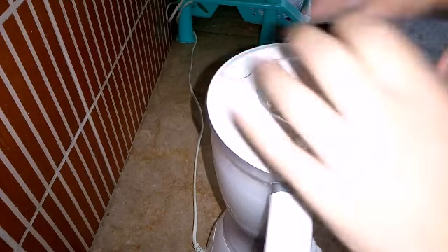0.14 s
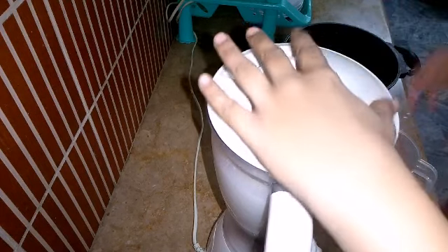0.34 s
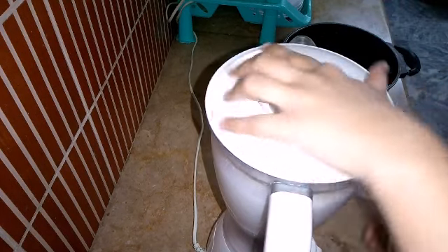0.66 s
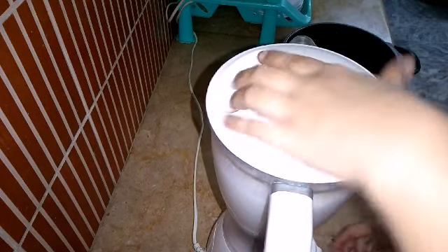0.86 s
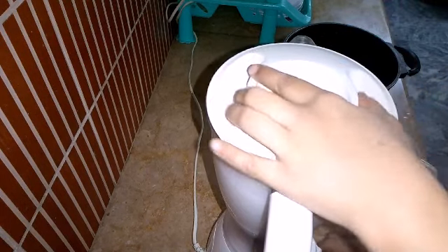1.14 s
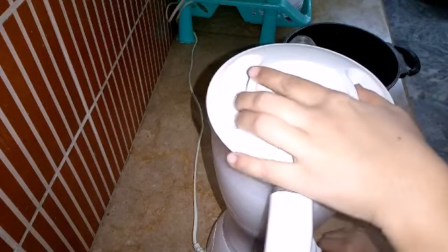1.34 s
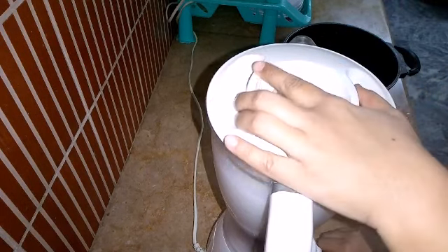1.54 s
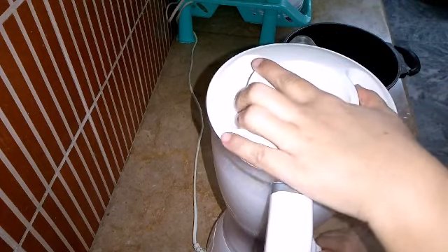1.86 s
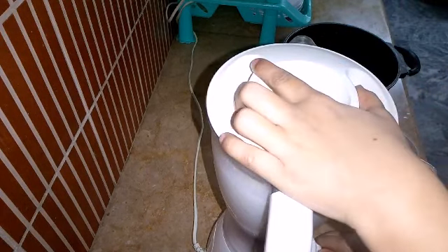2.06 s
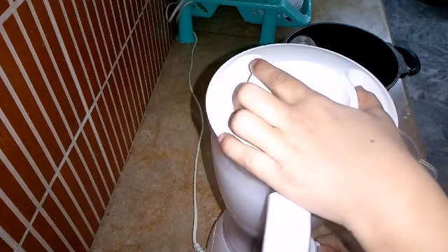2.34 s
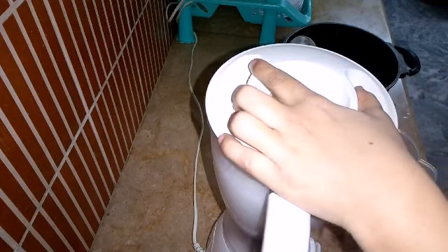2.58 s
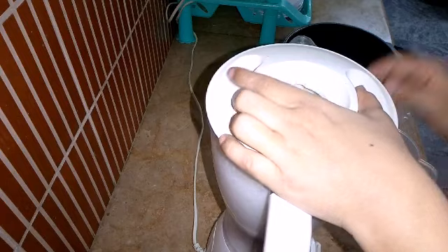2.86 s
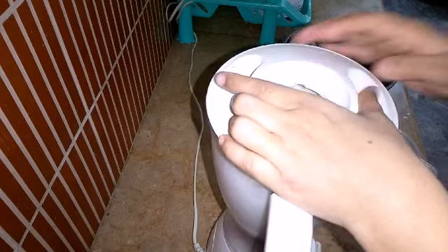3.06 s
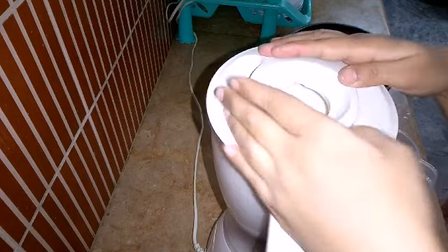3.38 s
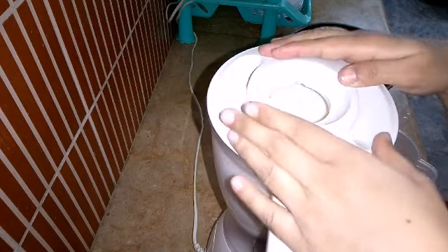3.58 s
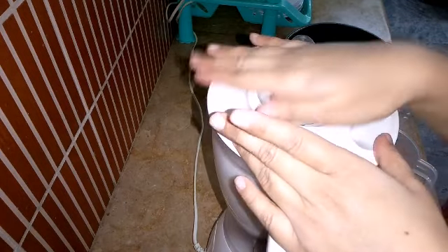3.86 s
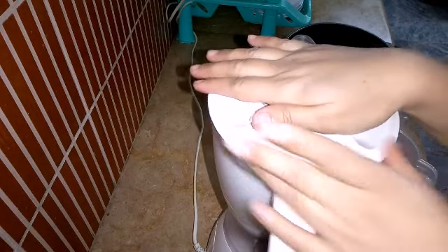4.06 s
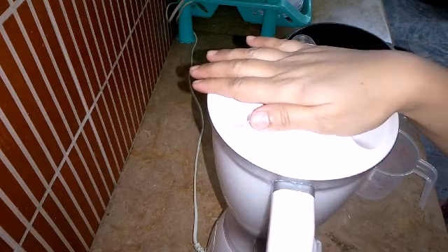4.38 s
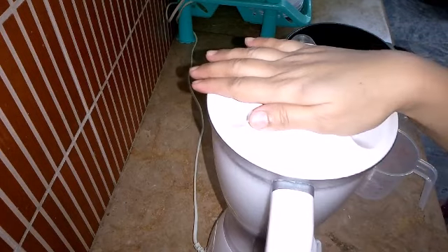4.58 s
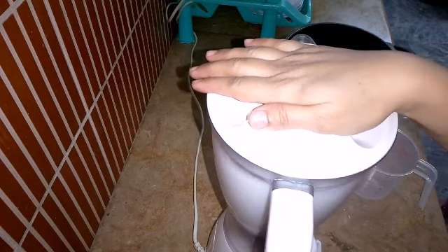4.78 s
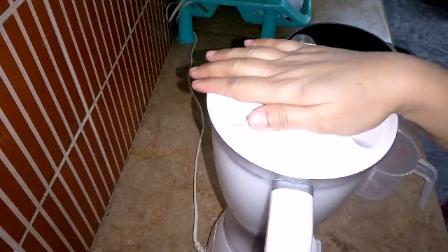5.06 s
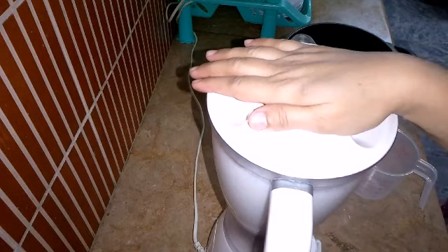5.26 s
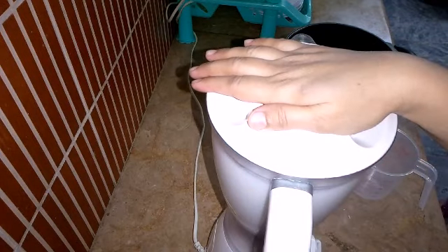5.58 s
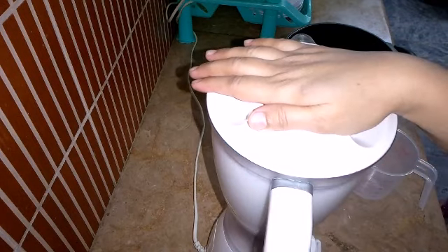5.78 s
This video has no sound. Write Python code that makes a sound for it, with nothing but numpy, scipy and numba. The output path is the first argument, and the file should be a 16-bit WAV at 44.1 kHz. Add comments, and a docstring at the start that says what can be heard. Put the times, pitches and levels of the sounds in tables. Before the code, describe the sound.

Fingers rub and tap a plastic blender lid in a quiet kitchen, then the motor starts abruptly, the lid rattles, and a palm steadies it.

```python
"""In a quiet kitchen, close to the phone, a hand rubs, taps and presses the plastic lid of a blender:
slipping skin is shaped noise, each touch a short push through the lid's resonances.
At the switch the motor runs up: wavering shaft tones and mains hum over noise for the churning liquid.
The loosely held lid then rattles on the jar, grains and a knock per turn through the same lid modes,
until a flat palm stills it. Room tone lies under all of it; a faint whine grows early and stays."""
import sys
import numpy as np
from scipy import signal
from scipy.fft import rfft, irfft, next_fast_len
from scipy.io import wavfile
from scipy.ndimage import uniform_filter1d
from numba import njit

SR = 44100
rng = np.random.default_rng(int(sys.argv[2]) if len(sys.argv) > 2 else 0)


def store_wav(level_fs):
    """Save 16-bit WAV to argv[1]."""
    pcm = np.round(np.clip(np.atleast_2d(level_fs), -1, 1) * 32767)
    wavfile.write(sys.argv[1], SR, pcm.T.astype(np.int16))


N = 261072
T = np.arange(N) / SR  # time, s

# resonances of the plastic lid: f/Hz, nominal width/Hz, relative level/dB
LID_MODES = [(418, 20, -2.5), (477.7, 66, 4), (537.4, 68, 0.5), (642, 64, 3.5), (721, 73, 1), (830, 37, -2),
             (1004, 310, -7.5), (1800, 770, -11.5)]

SWITCH_S = 2.286
PALM_S, PALM_TAKES_S = 3.92, 0.203  # the palm comes down on the lid
BITE_S, BITE_DB = 0.01, -34.5  # how fast, and from how far down, the blender sets in


def motor():
    """Shaft tones waver in level and phase as the load sloshes; mains pull shifts some by 100 Hz."""
    # the two strongest shaft tones: t/s, once-a-turn level/dB, twice-a-turn level/dB
    shake = [(2.5, -38, -48), (2.56, -44, -51), (2.7, -37, -28), (2.78, -40.5, -41.5), (2.84, -36, -45),
             (2.91, -41, -46), (2.96, -38, -37), (3.03, -37.5, -44), (3.18, -37, -37), (3.21, -48.5, -28.5),
             (3.28, -39, -37), (3.3, -48, -36.5), (3.4, -28.5, -30), (3.45, -40, -41.5), (3.5, -37, -29.5),
             (3.58, -34, -28.5), (3.6, -58, -28), (3.63, -35, -41.5), (3.73, -32, -44), (3.76, -32.5, -31),
             (3.79, -39, -38), (3.83, -31.5, -47), (3.88, -45, -41), (3.94, -29, -31), (3.99, -33, -40.5),
             (4.07, -35, -29), (4.12, -34, -36), (4.18, -32.5, -37), (4.22, -51, -35), (4.26, -32, -35),
             (4.29, -35.5, -32), (4.39, -27.5, -39.5), (4.49, -41.5, -28.5), (4.68, -43, -37.5),
             (4.79, -44.5, -28.5), (4.88, -48.5, -34), (5.05, -33, -41), (5.11, -46, -35.5),
             (5.19, -44, -38), (5.23, -45, -50), (5.26, -55, -40), (5.29, -42.5, -40), (5.32, -35.5, -35.5),
             (5.36, -43.5, -32.5), (5.5, -44, -37), (5.57, -37, -28), (5.62, -56, -47), (5.67, -45, -32.5),
             (5.74, -39, -38), (5.8, -49, -36.5), (5.87, -36.5, -36), (5.92, -48, -38)]
    # higher shaft tones: multiple of the turn, mains shift f/Hz, relative level/dB
    tones = [(0, 100, -55), (1, 100, -56), (2, -100, -56), (2, 100, -51), (3, 0, -60), (4, 0, -50),
             (5, 0, -56), (6, 0, -48.5), (7.5, 0, -55), (7, 0, -53), (12, 0, -55), (12, 100, -53.5)]
    slow_shaft_db = -25  # the once-a-turn tone is weak while the rotor is slow
    tones_slow_db, tones_settle_s = 9, 0.21  # higher tones start louder, then settle
    tones_loose_db = -8.5  # higher tones, loose lid against held lid
    hum_db, hum_centre_s, hum_1db_s = -39, 2.27, 0.043  # bell in dB; 1 dB down after hum_1db_s
    groan_hz, groan_width_hz, groan_db = 1040, 270, -41.5
    groan_s, groan_1db_s = 2.396, 0.023

    turn = 2 * np.pi * turns()
    once_db, twice_db = columns(shake)
    once_db = once_db + slow_shaft_db * since_on(.08) + walk(40)
    out = undb(once_db) * np.sin(turn + .55 * walk(20))
    out += undb(twice_db + 1.8 * walk(30)) * np.sin(2 * turn + .3 * walk(24))

    held = ramp(PALM_S, PALM_TAKES_S)
    effort = undb(tones_slow_db * since_on(tones_settle_s) + tones_loose_db * (0.5 - held))
    for k, shift_hz, db in tones:
        phase = k * turn + 2 * np.pi * shift_hz * T + (.6 + .05 * k) * walk(20)
        out += effort * undb(db + 2.2 * walk(20)) * np.sin(phase)

    # the slow rotor draws heavy current: mains hum and its overtones, fading as it gains speed
    overtones = ((1, .3), (2, 1), (3, .15))
    hum = sum(np.sin(2 * np.pi * 100 * k * T) * share for k, share in overtones)
    out += hum * undb(hum_db - ((T - hum_centre_s) / hum_1db_s) ** 2 + 2 * walk(29.7))

    # the straining motor groans
    groan = ring(ring(rng.standard_normal(N), groan_hz, groan_width_hz), groan_hz, groan_width_hz)
    out += level(groan, groan_db) * undb(-((T - groan_s) / groan_1db_s) ** 2)
    return np.sqrt(2) * out * undb(BITE_DB * since_on(BITE_S)) * (T > SWITCH_S)


def churn():
    """Blades beat the liquid: dense splashes, each band flickering; spray carries the treble."""
    # spectrum of the splashing: f/Hz, relative level/dB
    churn_colour = [(100, -25.5), (140, -10.5), (215, -20.5), (260, -10), (305, -7), (350, -14),
                    (400, -6.5), (460, -15.5), (520, -13.5), (620, -11.5), (820, -10.5), (1000, -12.5),
                    (1600, -15.5), (3300, -24.5), (6200, -33.5), (7700, -45.5), (12000, -36)]
    # resonances of the jar: f/Hz, width/Hz, lift in level/dB
    jar = [(181.5, 10, 7.5), (314.6, 4.5, 6), (854, 38, 2.5), (1086, 24, 1.5), (1148, 140, 4),
           (1401, 40, 2.5), (1954, 190, 3.5), (2460, 770, 3.5)]
    churn_db, slow_db, grow_s = -33.5, -6.5, 0.12
    spray_db, spray_s, spray_takes_s = -6.5, 2.37, 0.11
    early_db, loose_db = -8, 1.5  # before the blades bite; through the gap of the loose lid
    fling_hz, fling_width_hz, fling_db = 5500, 3200, -38
    fling_s, fling_1db_s = 2.45, 0.014

    db = churn_db + slow_db * since_on(grow_s) + BITE_DB * since_on(BITE_S)
    spray_db = spray_db + early_db * (1 - ramp(spray_s, spray_takes_s))
    spray_db = spray_db + loose_db * (1 - ramp(PALM_S, PALM_TAKES_S))

    rush = colour(rng.standard_normal(N) + 0.38 * grains(1200, 2.3), churn_colour)
    rush = rush + sum((undb(lift_db) - 1) * ring(rush, hz, w) for hz, w, lift_db in jar)
    low, high = cut(rush, 546, "low"), cut(rush, 2850, "high")
    middle = cut(cut(rush, 810, "high"), 1610, "low")
    body = undb(-3 + 1.5 * walk(25)) * low + undb(.6 * walk(12)) * middle
    spray = undb(spray_db + 0.6 * walk(25)) * level(high, 0)
    body = body / np.std(middle) + spray

    # liquid thrown up the wall as the blades bite
    fling = ring(ring(rng.standard_normal(N), fling_hz, fling_width_hz), fling_hz, fling_width_hz)
    fling = undb(fling_db - ((T - fling_s) / fling_1db_s) ** 2) * level(fling, 0)
    return (undb(db) * body + fling) * (T > SWITCH_S)


def turns():
    """Shaft turns so far: the speed nears its loose-lid value, then gains a little under the palm."""
    first_hz, loose_hz, held_hz, run_up_s = 68, 142.2, 144.7, .165
    hz = loose_hz - (loose_hz - first_hz) * since_on(run_up_s)
    hz = hz + (held_hz - loose_hz) * ramp(PALM_S, PALM_TAKES_S)
    return np.cumsum(hz) / SR


def rattle():
    """The lid chatters on the shaking jar, partly in step with each turn."""
    # jolts that throw the lid harder: t/s, relative level/dB
    jolts = [(2.606, -54), (2.711, -30.5), (2.851, -47), (3.208, -27), (3.241, -26.5), (3.27, -23.5),
             (3.305, -24), (3.36, -35), (3.418, -25), (3.613, -23), (3.69, -34), (3.831, -29.5)]
    jolt_rise_s, jolt_fall_s = 0.0048, 0.041
    rattle_s, rattle_db, stilled_db, buzz_db = 2.54, -28, -19, -4.5
    gripped_db, free_db = -5, -1  # upper modes come up as the fingers let go
    let_go_s, let_go_takes_s = 3.17, 0.059

    held = ramp(PALM_S, PALM_TAKES_S)
    size = undb(rattle_db)
    for s, db in jolts:
        size = size + undb(db) * ramp(s, jolt_rise_s) * np.exp(-abs(T - s) / jolt_fall_s)
    upper_db = gripped_db + (free_db - gripped_db) * ramp(let_go_s, let_go_takes_s)

    knocks = np.diff(np.floor(turns()), prepend=0) * undb(2 * walk(60))  # one a turn
    force = (grains(9000, .6) + 2.2 * knocks) * undb(.5 * walk(50))
    chatter = size * cut(lid(force, upper_db), 392, "high") / 2
    # a buzz at four times the turn
    buzz = undb(buzz_db + 1.5 * walk(25)) * np.sin(8 * np.pi * turns() + 1.1 * walk(30))
    gate = ramp(rattle_s, 0.014) * (1 - held) * undb(stilled_db * held)
    return gate * (chatter + undb(rattle_db) * buzz)


def lid(force, upper_db):
    """A force rings the lid's modes; those above 620 Hz have their own share."""
    out = 0
    for hz, w, db in LID_MODES:
        mode = ring(ring(force, hz, w), hz, 3 * w)
        out = out + undb(db + upper_db * (hz > 620)) * level(mode, 0)
    return out


def taps():
    """A soft push rings the lid modes near its pitch; a nail or latch adds a short tick."""
    # taps, presses, the switch and the hardest knocks of the loose lid:
    # t/s, thump peak level/dB, pitch f/Hz, tick peak level/dB, tick f/Hz
    tap_list = [(0.019, -38, 560, -53, 2800), (.352, -70, 500, -64, 5200), (0.418, -30, 527, -68, 2000),
                (0.434, -43, 500, -70, 2800), (.44, -72, 500, -64, 4500), (0.475, -29, 475, -37.5, 1190),
                (0.491, -31, 410, -36.5, 3180), (0.662, -40, 715, -33.5, 2700),
                (0.784, -43, 430, -62, 2800), (0.798, -43, 420, -57, 2800), (0.975, -51, 485, -67, 2800),
                (0.986, -36, 480, -50, 1500), (1.019, -59, 670, -50, 4140), (1.138, -44, 479, -52, 2800),
                (1.197, -30.5, 480, -37, 1170), (1.212, -43, 473, -66, 1500), (1.261, -41, 555, -41, 1100),
                (1.267, -38.5, 480, -57, 1300), (1.513, -53, 644, -66, 3100),
                (1.543, -49.5, 664, -41, 2450), (1.557, -54, 1110, -50, 2050), (1.676, -72, 600, -58, 2300),
                (1.802, -60, 1320, -74, 1300), (1.854, -58, 200, -71, 1500), (1.944, -54, 474, -74, 1200),
                (2.285, -48, 600, -59, 2800), (2.304, -34, 604, -34, 2850), (3.257, -10, 560, -30, 1500),
                (3.311, -19.5, 470.4, -31, 1530), (3.427, -23, 533, -40, 1480),
                (3.612, -15, 607, -35, 1310), (3.835, -22.5, 640, -44, 3300)]
    # resonances of the latch: f/Hz, width/Hz, relative level/dB
    latch_modes = [(1180, 120, -9), (1990, 150, -2), (2350, 110, 2), (2560, 130, 1), (3000, 300, -7),
                   (4700, 300, -18)]
    latch_s = 1.542  # the tap at which the latch snaps

    out, t = np.zeros(N + SR // 4), T[:SR // 4]
    chance = rng.standard_normal((len(tap_list), len(t)))
    for (s, thump_db, hz, tick_db, tick_hz), noise in zip(tap_list, chance):
        push = np.sin(2 * np.pi * hz * t) * (t / .001) * np.exp(-t / .0017)
        slap = cut(ring(noise * np.exp(-t / .004), 2.2 * hz, 1.6 * hz), 1800, "low")
        modes = sum(undb(db) * ring(push, f, .4 * w) for f, w, db in LID_MODES)
        thump = push + 1.3 * modes + .4 * slap

        crack = noise * (np.exp(-t / 0.0048) + 0.064 * np.exp(-t / 0.014))
        tick = .6 * ring(ring(crack, tick_hz, .8 * tick_hz), tick_hz, tick_hz)
        if abs(s - latch_s) < .005:
            scrape = noise * (np.exp(-t / .003) + .16 * np.exp(-t / .09))
            tick = tick + 3.5 * sum(undb(db) * ring(scrape, f, w) for f, w, db in latch_modes)

        i = int(s * SR)
        out[i:i + len(t)] += undb(thump_db) * thump / abs(thump).max()
        out[i:i + len(t)] += undb(tick_db) * tick / abs(tick).max()
    return out[:N]


def rub():
    """Skin slips over plastic: fine hiss, small slips that shake the lid, a rumble underneath."""
    # strokes of the fingers: start t/s, hold t/s, skin hiss level/dB, lid body level/dB, fade/(dB per s)
    strokes = [(0, 0.022, -60.5, -57.5, 63), (0.148, 0.047, -69, -72, 80), (.23, .06, -72, -82, 60),
               (0.318, 0.091, -66, -70, 62), (0.485, 0.047, -60.5, -55, 49), (0.6, 0.12, -56.5, -52, 82),
               (0.864, 0.12, -70.5, -68, 50), (0.983, .18, -63, -56.5, 65), (1.205, .03, -64, -54, 60),
               (1.262, 0.023, -67, -53.5, 60), (1.56, 0.073, -73.5, -75, 84),
               (2.137, 0.018, -72, -72.5, 226)]
    # spectrum of the skin hiss: f/Hz, relative level/dB
    skin = [(530, -30), (900, -1), (1100, 1), (1370, -3), (2390, -1.5), (3290, -1.5), (3800, -0.5),
            (6730, -17), (7630, -97), (9920, -54), (16800, -120)]
    rise_db_s, body_steeper = 298, 1.09
    rumble_db, rumble_follows = -63.5, 0.75  # the rumble follows part of the hiss level

    start, hold, hiss_db, body_db, fade = np.transpose(strokes)[:, :, None]
    drop = rise_db_s * np.maximum(start - T, 0) + fade * np.maximum(T - start - hold, 0)
    hiss_db = (hiss_db - drop).max(axis=0)
    body_db = (body_db - body_steeper * drop).max(axis=0)
    rumble_db = rumble_db + rumble_follows * (hiss_db + 62.5) + 2.5 * walk(15.3)

    hiss = colour(rng.standard_normal(N) + 1.5 * grains(700, 2.3), [(300, -33)] + list(skin))
    # lighter strokes are duller
    treble_db = np.minimum(0.59 * (hiss_db + 61.5), 0)
    hiss = cut(hiss, 3400, "low") + undb(treble_db) * cut(hiss, 2460, "high")
    slips = lid(grains(1500, 1.5) * undb(1.2 * walk(40)), -4)
    rumble = rng.standard_normal(N)
    rumble = ring(rumble, 105, 29) + 0.72 * ring(rumble, 171, 62)

    heard = undb(hiss_db + 0.68 * walk(26.6)) * level(hiss, 0.19)
    heard = heard + undb(body_db) * level(slips, -0.41)
    return heard + undb(rumble_db) * level(rumble, -0.043)


def kitchen():
    """Low room tone from shaped noise, with a faint whine that comes up between 1.3 and 1.6 s."""
    # spectrum of the room tone: f/Hz, relative level/dB
    room_colour = [(18, -49.5), (30, 13.5), (174, 17), (353, -15.5), (638, 11), (880, -4.5), (1000, -11),
                   (1100, 4), (1290, -1), (2620, -10.5), (2940, -0.5), (7000, -23.5), (9100, -45.5),
                   (15400, -120)]
    room_db, whine_hz, whine_db = -73.5, 1103, -82.5
    tone = level(colour(rng.standard_normal(N), room_colour), room_db) * undb(2 * walk(3.1))
    whine = np.sin(2 * np.pi * whine_hz * T + .7 * walk(15))
    whine = np.sqrt(2) * undb(whine_db + 1.5 * walk(12)) * whine
    return tone + whine * np.interp(T, [1.3, 1.6], [.3, 1])


def kitchen_echo(near, blender):
    """The room answers with a decaying noise tail; the blender's lows are left out of it."""
    t60_s, near_db, blender_db = 0.54, -10.5, -14
    t = T[:SR // 2]
    tail = rng.standard_normal(len(t)) * np.exp(-np.log(1000) * t / t60_s) * (t > .004)
    sent = near * undb(near_db) + cut(blender, 341, "high") * undb(blender_db)
    return signal.fftconvolve(sent, tail / np.linalg.norm(tail))[:N]


def stereo_width(mid):
    """The two channels are almost the same; a smeared, flickering difference comes and goes, mostly in the
    treble."""
    # side against mid before the flicker: f/Hz, level/dB
    side_gap = [(60, -14), (125, -46), (250, -55), (500, -52), (1000, -44), (2000, -38), (4000, -32),
                (8000, -22)]
    smear = rng.standard_normal(size=3000)
    side = colour(signal.fftconvolve(mid, smear / np.linalg.norm(smear)), side_gap)[:N]
    side = side * undb(9.0 * walk(20).clip(-4, 1.6))
    return np.array([mid + side, mid - side])


def undb(db):
    """Decibels to amplitude."""
    return 10 ** (np.asarray(db) / 20)


def level(x, db):
    """Set the RMS level in dB."""
    return x * undb(db) / np.sqrt(np.mean(x ** 2))


def columns(table):
    """Curve columns at every sample; the first column is time in s."""
    s, *rest = np.transpose(table)
    return [np.interp(T, s, c) for c in rest]


def walk(rate):
    """Random levels held 1 / rate s and slewed twice; spread near 1."""
    k = int(SR / rate)
    steps = np.repeat(rng.standard_normal(N // k + 1), k)
    return 1.99 * uniform_filter1d(uniform_filter1d(steps, k), k)[:N]


def colour(x, table):
    """Shape a sound's spectrum by (f/Hz, level/dB) points."""
    hz, db = np.transpose(table)
    size = next_fast_len(len(x) + SR // 2)
    f = np.maximum(np.fft.rfftfreq(size, 1 / SR), 1)
    gain = undb(np.interp(np.log(f), np.log(hz), db))
    return irfft(rfft(x, size) * gain, size)[:len(x)]


def ring(x, hz, width):
    """One resonance, gain 1 at its centre."""
    return signal.lfilter(*signal.iirpeak(hz, hz / width, fs=SR), x)


def grains(per_s, spread_db):
    """Sparse clicks of uneven size and random sign."""
    chance, size = rng.random((N, 2)).T
    return (chance < per_s / SR) * undb(-spread_db * np.log(1 - size)) * rng.choice([-1, 1], N)


def cut(x, hz, kind):
    """Third-order low-pass or high-pass."""
    return signal.sosfilt(signal.butter(3, hz, kind, fs=SR, output="sos"), x)


def ramp(s, takes):
    """Straight rise from 0 to 1, starting at s."""
    return np.clip((T - s) / takes, 0, 1)


def since_on(takes):
    """1 up to the switch, dying away after it."""
    return np.exp(-np.maximum(T - SWITCH_S, 0) / takes)


@njit
def since_peak(size, top, keep):
    """1 when the size passes top, dying away after."""
    out, e = np.empty(len(size)), 0.
    for i in range(len(size)):
        e = 1. if size[i] > top else e * keep
        out[i] = e
    return out


def scene():
    """Hand and blender with their echo, the dry rub and the kitchen, in two channels."""
    near = taps()
    blender = motor() + churn() + rattle()
    return stereo_width(near + blender + kitchen_echo(near, blender) + rub() + kitchen())


def record(dry):
    """The phone drops deep bass, turns loudness down, ducks after peaks, rounds tops, cuts treble."""
    hold_db, hold_share, hold_s = -25, 0.55, 0.017  # threshold, share of excess removed, memory
    duck_at, duck_db, duck_s = .27, -5.5, .06  # a peak over this size drops the gain, which creeps back
    top_hz = 7750

    dry = cut(cut(dry, 78, "high"), 45, "high")
    keep = np.exp(-1 / (hold_s * SR))
    power = signal.lfilter([1 - keep], [1, -keep], dry.mean(axis=0) ** 2)
    loud_db = 10 * np.log10(power.clip(1e-12))
    dry = dry * undb(-hold_share * np.maximum(loud_db - hold_db, 0))

    duck = since_peak(abs(dry.mean(axis=0)), duck_at, np.exp(-1 / (duck_s * SR)))
    duck = signal.lfilter([.01], [1, -.99], duck)  # the drop takes about 2 ms
    dry = np.tanh(3 * dry * undb(duck_db * duck)) / 3
    return signal.sosfilt(signal.ellip(8, .3, 55, top_hz, fs=SR, output="sos"), dry)


dry = scene()
out = record(dry)
store_wav(out)
```